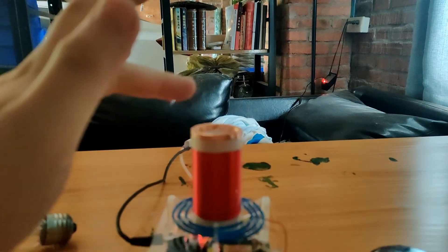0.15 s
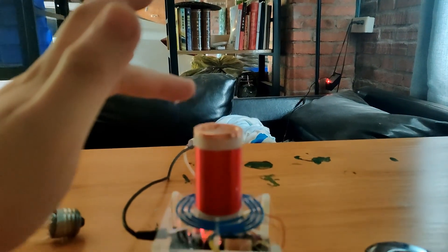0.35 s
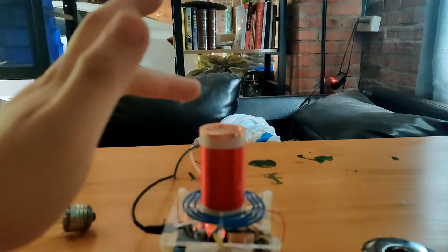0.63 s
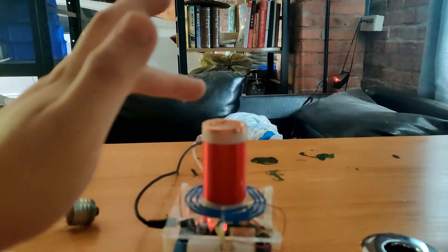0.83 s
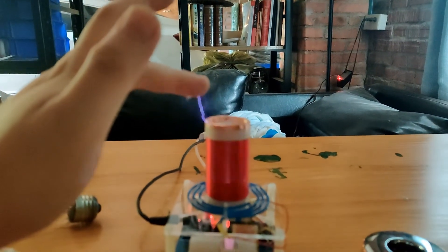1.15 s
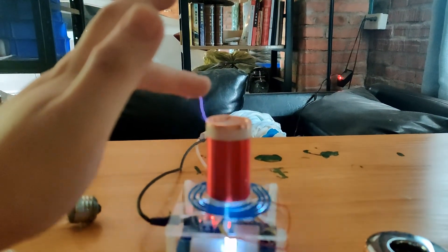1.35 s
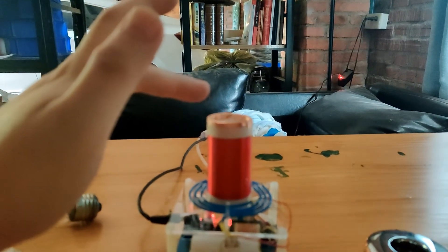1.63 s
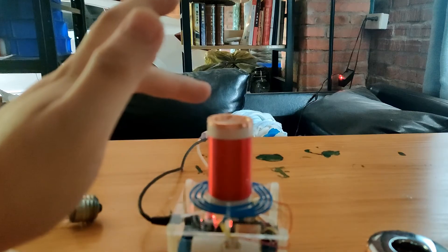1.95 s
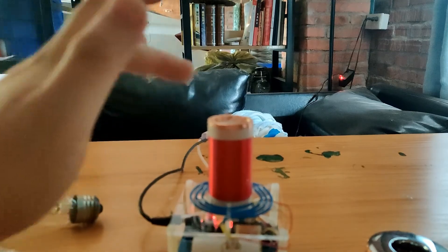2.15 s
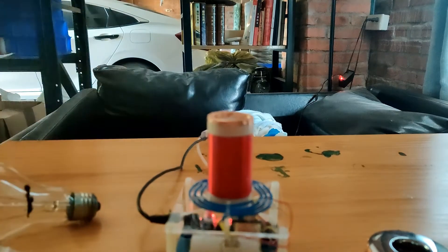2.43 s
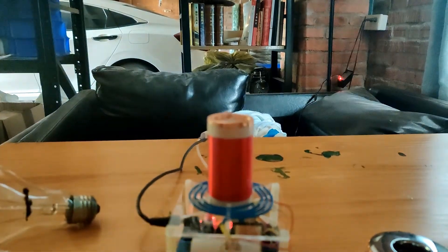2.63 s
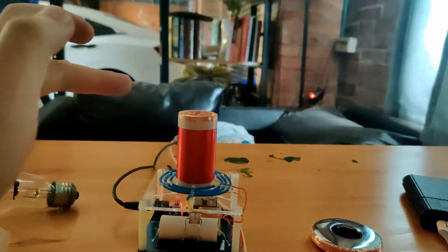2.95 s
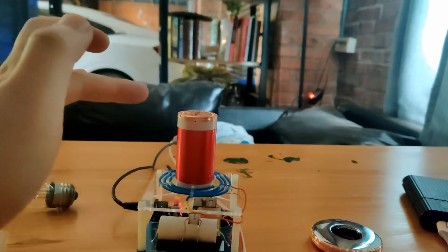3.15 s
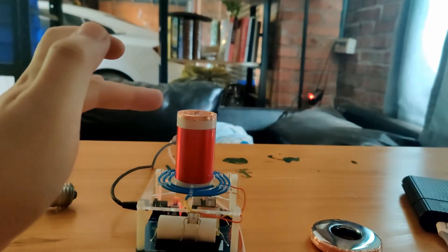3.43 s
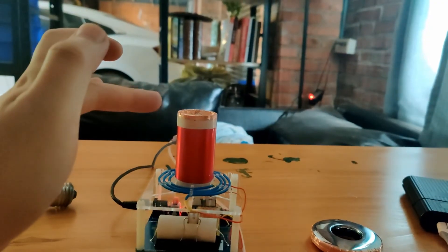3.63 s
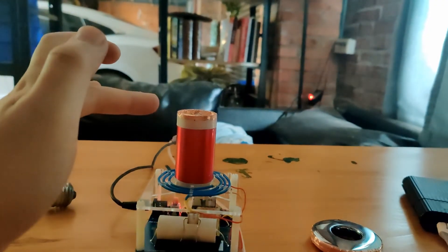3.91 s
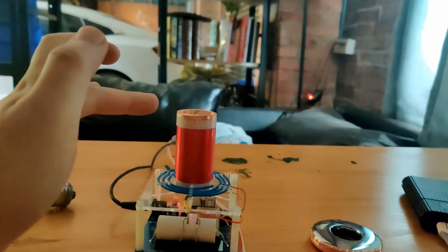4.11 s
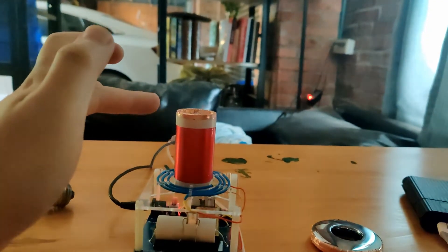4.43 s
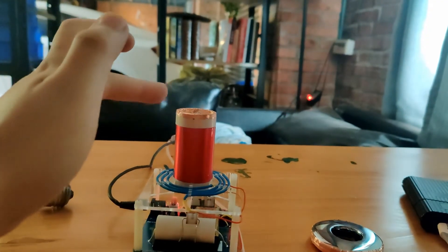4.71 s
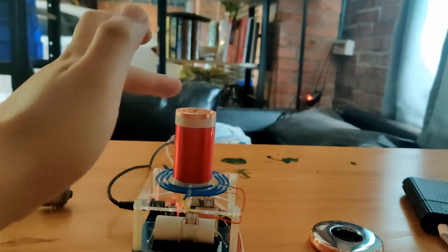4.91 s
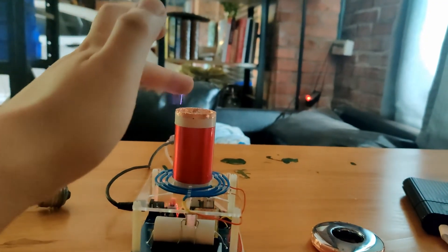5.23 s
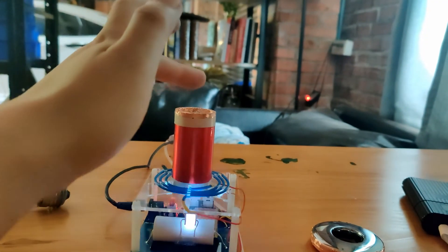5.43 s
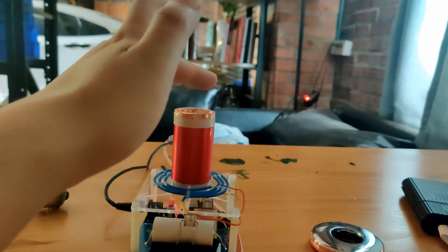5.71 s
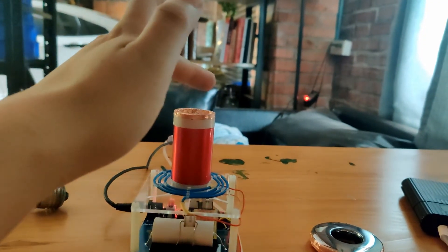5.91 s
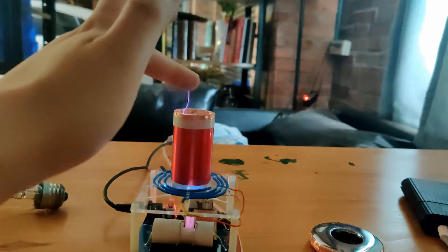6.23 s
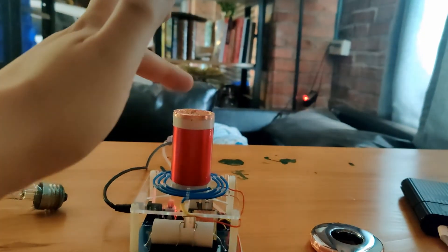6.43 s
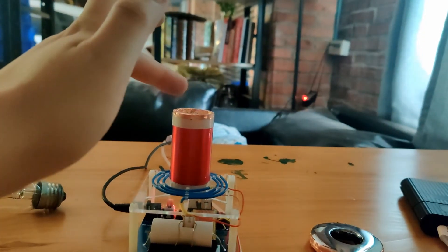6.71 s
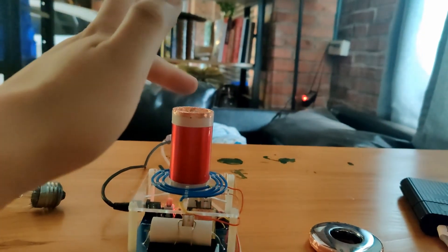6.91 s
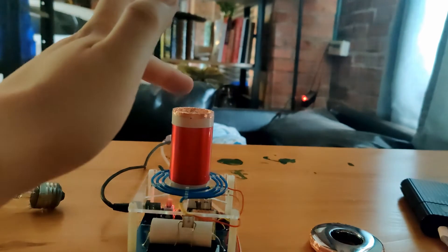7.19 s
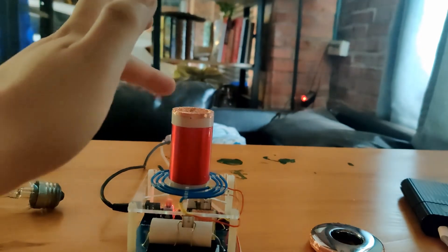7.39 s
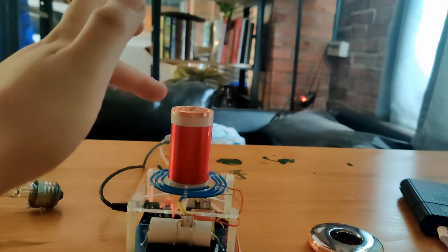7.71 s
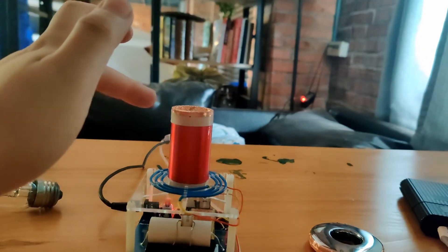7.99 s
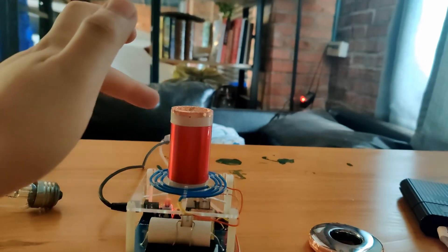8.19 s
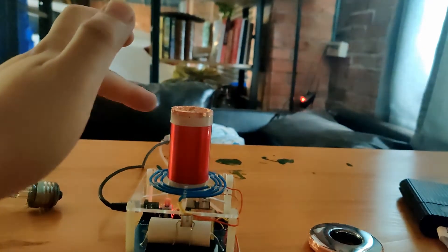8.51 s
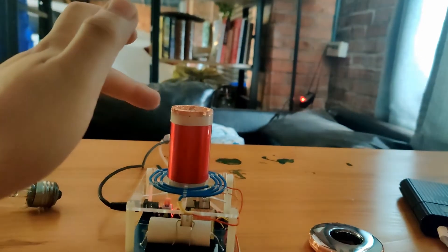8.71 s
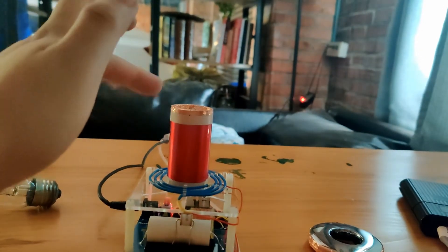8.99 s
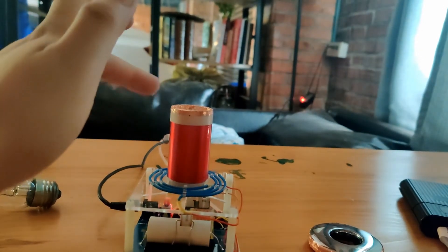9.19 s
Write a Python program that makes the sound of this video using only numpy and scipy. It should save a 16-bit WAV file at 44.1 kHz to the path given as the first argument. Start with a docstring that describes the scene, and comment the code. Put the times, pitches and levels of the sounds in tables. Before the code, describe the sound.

From 0 s a small spark coil on a table gives sharp electric cracks, nearly even, about ten a second, each a click of a few milliseconds with quick wall slaps and a short bright room tail. Between 0.35 and 0.85 s faint, hollow wooden knocks sound, mostly on the right. Cracks stay strong until 2.2 s, then become weaker and their tone changes. Around 2.73 to 2.86 s everything cuts out, then fades back in. Low rumble swells at about 3.1 s and continues underneath with faint hiss. From 3.7 s the tone changes again and cracks get fuller, loudest at roughly 5.4 to 6.6 s. After about 8.1 s they weaken sharply; the left side lurches with deep thumps and rough flutter, often nearly muted until 9.25 s, while small ticks persist on the right. Just before 9.3 s a strong crack returns.

```python
"""Sharp electric cracks come first, about ten a second, from a small spark-gap coil on a table in a brick room.
A phone with two microphones hears them; each crack is a burst of close arrivals, and walls and room answer in noise.
Wooden knocks ring as a few fading tones; rumble and hiss are filtered noise, and the crack colour changes twice.
The left input is pushed about by the coil's field and at last swings up to its rail; the sound drops out once."""
import sys
import numpy as np
from scipy import signal
from scipy.fft import rfft, irfft, next_fast_len
from scipy.io import wavfile
from scipy.ndimage import uniform_filter1d, map_coordinates

SR = 44100
rng = np.random.default_rng(int(sys.argv[2]) if len(sys.argv) > 2 else 0)


def unload_audio(sound):
    """Save the sound as a 16-bit wav file, at the path given as the first command line argument."""
    columns = np.transpose(np.atleast_2d(sound))
    # keep every value between -1 and 1, then stretch to whole-number steps
    steps = np.round(np.clip(columns, -1, 1) * 32767)
    wavfile.write(sys.argv[1], SR, steps.astype(np.int16))


N = 412335
TIME = np.arange(N) / SR  # s


def amp(db):
    """Turn dB into a plain gain."""
    return 10 ** (np.asarray(db) / 20)


def unit(x):
    """Bring each row to an average strength (rms) of 1."""
    return x / np.sqrt(np.mean(x ** 2, -1, keepdims=True) + 1e-20)


def curves(rows):
    """Join the points of each column after the time into a curve with one value per sample."""
    s, *columns = np.transpose(rows)
    return [np.interp(TIME, s, column) for column in columns]


def wobble(rate):
    """Draw a smooth random curve through `rate` random points a second."""
    points = rng.standard_normal(int(N * rate / SR) + 4)
    return map_coordinates(points, [TIME * rate])


def filtered(x, response):
    """Make each pitch in x louder or softer by a gain that depends on frequency."""
    length = next_fast_len(N + 8192)
    gain = response(np.fft.rfftfreq(length, 1 / SR))
    return irfft(rfft(x, length) * gain, length)[..., :N]


def colour(table, axis):
    """Turn one dB column into a gain over frequency, with mean power 1 from 2.5 to 16 kHz."""
    rows = np.array(table)

    def gain(hz):
        return amp(np.interp(np.log(hz + 1), np.log(rows[:, 0]), rows[:, axis]))

    treble = np.sqrt(np.mean(gain(np.linspace(2500, 16000, 99)) ** 2))
    return lambda hz: gain(hz) / treble


def causal(response):
    """Turn a gain curve into a short filter that answers as early as it can (minimum phase)."""
    cepstrum = irfft(np.log(response(np.fft.rfftfreq(512, 1 / SR))))
    cepstrum[1:256] *= 2
    cepstrum[257:] = 0
    return irfft(np.exp(rfft(cepstrum)))[:256]


def ramp(start, length):
    """Rise smoothly from 0 to 1 over `length` seconds."""
    return .5 - .5 * np.cos(np.pi * np.clip((TIME - start) / length, 0, 1))


# Background before its random swells: t/s, base rumble level/dB, base hiss level/dB
BACKGROUND = [(0, -59.5, -64), (.55, -52, -48), (1.1, -54, -59), (1.9, -59, -61), (2.35, -49.5, -56),
              (2.65, -52, -57), (2.95, -54.5, -56), (3.0, -45, -52), (3.15, -33, -51), (3.7, -38.5, -51),
              (3.85, -45, -52), (4.5, -41.5, -51), (5.3, -43.5, -51), (5.8, -43, -49), (6.8, -42, -49),
              (8.05, -45.5, -52), (8.25, -56, -70), (8.6, -63, -70), (9.15, -62, -64), (9.3, -37, -51)]


def rumble():
    """Lumpy noise, strongest at a few tens of Hz, mostly shared by both inputs and weaker on the left."""
    level_db, _ = curves(BACKGROUND)

    def low(hz):
        return (hz / 22) ** 2 / (1 + (hz / 22) ** 2) / (1 + (hz / 48) ** 3)

    shared, own = unit(filtered(rng.standard_normal((2, N)), low))
    return amp(level_db + 3.8 * wobble(7)) * np.array([0.34 * shared + 0.083 * own, shared])


# Colour of the hiss: f/Hz, relative level/dB
HISS_COLOUR = [(60, -11), (150, -1), (400, -5.5), (1000, -13.5), (2500, -17), (6000, -14.5), (16000, -48)]


def hiss():
    """The room's faint hiss is coloured noise; a band around 250 Hz hums in and out of it."""
    _, level_db = curves(BACKGROUND)
    shape = colour(HISS_COLOUR, axis=1)
    noise = unit(filtered(rng.standard_normal((2, N)), lambda hz: (hz > 60) * shape(hz)))
    hum = unit(filtered(rng.standard_normal(N), lambda hz: np.exp(-((hz - 250) / 60) ** 2)))
    noise = noise + amp(-16 + 3.8 * wobble(2.98)) * hum
    swell_db = 1.5 * wobble(5)
    return amp(level_db + swell_db) * noise * amp([[-6], [0]])  # left, right


# Blows on wood: t/s, relative level/dB, freedom to ring [0-1]
BLOWS = [(0.3627, -20, .08), (.409, -23, 0.9), (0.51, -22, 0.7), (0.617, -25, 0.3), (.627, -19, 0.9),
         (.64, -23.5, 0.4), (0.794, -26.5, 0.2), (.815, -19, 0.97)]
# Tones of the wood: f/Hz, usual relative level/dB, time to fall 60 dB when fully free/s
WOOD_TONES = [(180, -15, 0.19), (330, -5.5, 0.23), (406.4, -9.5, 0.31), (531, -2.5, 0.093),
              (747, -11, 0.094), (824, -21.5, 0.19), (978, -9.5, 0.054), (1176, -15, 0.1)]


def knocks():
    """A blow on wood sets fading tones ringing, with a soft puff of noise; it is louder on the right."""
    out, t = np.zeros(N + SR), np.arange(SR // 3) / SR
    for s, db, free in BLOWS:
        ring = np.zeros(len(t))
        for hz, level, t60 in WOOD_TONES:
            fade = amp(level + rng.normal(0, 1) - 60 * t / (t60 * free))
            waver = 0.61 * wobble(40)[:len(t)]  # radians; blurs the tone a little
            ring += fade * np.sin(2 * np.pi * hz * t + waver)
        soft = uniform_filter1d(uniform_filter1d(rng.standard_normal(len(t)), size=20), size=20)
        puff_fade = .25 * amp(-60 * t / (.09 * free + .01)) + .8 * amp(-60 * t / .025)
        push = 1 - np.exp(-t / 0.00041)  # the blow takes a moment to build up
        start = round(s * SR)
        out[start:start + len(t)] += amp(db - 3.0) * (ring + unit(soft) * puff_fade) * push
    return out[:N] * amp([[-12], [0]])  # left, right


# Slow shifts of the left bias: start t/s, end t/s, shift [parts of full scale], edge length/s
SHIFTS = [(-.05, .08, -.025, .007), (.08, .171, -.1, .007), (2.99, 3.02, -.025, .02), (3.02, 3.35, .05, .1),
          (7.99, 8.047, -.13, .022), (8.15, 9.4, -.2, .025)]


def drift():
    """The resting bias wanders, and charge put on the input leaks away slowly."""
    leak_s = 1.6
    out = -.005 + 0.0039 * wobble(4.6)
    for start, end, depth, edge in SHIFTS:
        held = ramp(start, edge) * (1 - ramp(end, edge))
        out += depth * held * np.exp(-np.abs(TIME - start) / leak_s)
    return out


# Spark-driven jumps: t/s, creep before and jump after [parts of full scale], recovery time/s
BIAS_JUMPS = [(.1725, -.07, -.02, .3), (4.378, 0, .07, .04), (4.487, -.1, 0, .01), (4.595, -.05, 0, .01),
              (4.916, 0, .11, .03), (5.008, -.05, 0, .01), (6.716, .07, -.04, .02), (6.913, -.04, 0, .01),
              (7.9045, 0, .14, .05), (8.0006, .07, -.12, .003), (8.0935, .1, 0, .002),
              (8.0988, -.04, .52, .07), (8.1995, -.28, .15, .02), (8.2047, .12, -.35, .004),
              (8.325, -.28, -.28, .007), (8.8815, 0, -.2, .002), (8.886, -.45, 0, .02),
              (9.2775, -.38, .09, .02)]


def jumps():
    """A spark throws the charge on the left input off; it creeps beforehand and recovers afterwards."""
    creep_s = .004
    out = np.zeros(N)
    for s, creep, jump, recovery in BIAS_JUMPS:
        before = TIME < s
        out += np.where(before, creep, jump) * np.exp(-np.abs(TIME - s) / np.where(before, creep_s, recovery))
    return out


def sputter():
    """A short burst of dull noise sputters around the double jump at about 8.2 s."""
    noise = unit(filtered(rng.standard_normal(N), lambda hz: (hz < 3300) / (1 + hz / 500)))
    return .022 * noise * np.exp(-((TIME - 8.203) / .019) ** 4)


# Swings to the upper rail: start t/s, fall start t/s,
# height there and dip at the start [parts of full scale, before waver and flattening]
RAIL_SWINGS = [(8.261, 8.358, 1.05, .11), (8.491, 8.546, 1.05, .42), (8.662, 8.73, 1.1, .3),
               (8.862, 8.935, .7, .04), (9.051, 9.178, .48, .18)]


def swings():
    """The charge lifts the left input to its rail and lets it fall, with a rough tremor and late ripples."""
    rise_s, fall_s, top = .023, .039, 1.06

    def rough(hz):
        return (hz > 60) / (1 + (hz / 160) ** 2) / (1 + (hz / 800) ** 4)

    tremor = .011 * unit(filtered(rng.standard_normal(N), rough))  # the charge never moves smoothly
    out = np.zeros(N)
    for start, end, last, dip in RAIL_SWINGS:
        held = ramp(start, rise_s) * (1 - ramp(end, fall_s))
        landed = TIME - end - fall_s
        height = np.interp(TIME, [start + rise_s, end], [top, last]) * (1 + .05 * wobble(55))
        out += height * held - dip * np.exp(-((TIME - start) / 0.0047) ** 2)
        edges = np.exp(-((TIME - start) / 0.023) ** 2) + np.exp(-(landed / 0.022) ** 2)
        out += tremor * (edges + 0.29 * held)
        out += .045 * wobble(110) * np.exp(-(landed / .014) ** 2)  # settling ripples
    return out


def bias():
    """The coil's field charges the left input: the pushes add up and flatten softly near the rail."""
    out = drift() + jumps()
    out = uniform_filter1d(uniform_filter1d(out, size=9), size=9)  # the input cannot jump at once
    out += sputter() + swings()
    return out / (1 + np.abs(out / 1.3) ** 12) ** (1 / 12)


# The sparks: t/s, right crack energy level/dB, fatness of the arc = left low-pop energy level/dB
SPARK_LIST = [(.0049, -3.5, -32), (0.0822, -3, -23), (.18, 3, -6), (.287, 3, -4), (0.3942, 5, -7),
              (0.4918, -0.5, -31), (.599, 2, -34), (0.7068, 4, -28), (0.8161, 4, -14), (0.9134, 4.5, -17),
              (1.0104, 4, -7), (1.1183, 4, -12.5), (1.225, 3.5, -20), (1.3229, 4, -10), (1.4298, 1.5, -21),
              (1.5381, 8, -21), (1.6457, 6.5, -5), (1.7428, 6, -21), (1.8412, 2, -7), (1.9376, 4, -6),
              (2.0459, 1.5, -11), (2.154, 4.5, -7), (2.2624, -5.5, -20), (2.3697, -6.5, -24),
              (2.4779, -4.5, -18.5), (2.5952, -3, -18.5), (2.7043, -6.5, -21), (2.9086, -11, -27),
              (3.0157, -5, -18), (3.1244, -3.5, -16.5), (3.221, -3, -17), (3.3184, .5, -17),
              (3.426, 1.5, -18), (3.5335, 1.5, -22), (3.6326, 0.5, -22), (3.7394, 4, -2.5), (3.8471, 5, -6),
              (3.9436, 0, -23), (4.052, 4.5, -4.5), (4.1596, 4, -4.5), (4.2664, 1.5, -28),
              (4.3766, 3.5, -6), (4.4942, 3.5, -6), (4.6019, 4, -12), (4.6994, 5, -11.5), (4.8073, 5, -9),
              (4.9147, 6, -8.5), (5.012, 6.5, -11), (5.1194, 7, -12), (5.2168, 7, -12.5), (5.314, 6, -9.5),
              (5.4112, 8.5, -14), (5.5085, 8.5, -20), (5.605, 8.5, -15.5), (5.713, 9, -11),
              (5.8105, 6, -11.5), (5.9073, 6, -10.5), (6.0139, 5, -18), (6.1123, 8, -9.5),
              (6.2209, 10, -15.5), (6.317, 7, -5.5), (6.4145, 6.5, -8), (6.5116, 6, -6.5),
              (6.6086, 7.5, -14.5), (6.7161, 4.5, -9), (6.8132, 5, -11), (6.9109, 6, -8), (7.0185, 6, -24),
              (7.1263, 6, -19), (7.2239, 7.5, -19), (7.3204, 4.5, -10), (7.4179, 3.5, -4.5),
              (7.515, 3.5, -9), (7.612, 4.5, -3), (7.7096, 4, -5), (7.8068, 3, -3.5), (7.903, 4, -5.5),
              (8.0008, 1, -10), (8.0975, -12, -4), (8.2046, -6.5, -17), (8.3127, -9.5, -12),
              (8.4206, -8, -4), (8.5192, -12, -8), (8.5952, -7.5, -1), (8.6911, -9.5, -10),
              (8.7885, -8, -24), (8.886, -9, -19), (8.983, -9, -20), (9.0792, -14, -19), (9.177, -9, -36),
              (9.2855, 4, -11)]
# A usual spark at the left microphone: t/s, level/dB
LEFT_LEVEL = [(0, -15), (.1, -0.5), (2.2, 1), (2.7, 0.5), (2.9, -5.5), (3.6, -5), (4.5, 0), (5.5, 0),
              (6.3, 1), (7.1, 0), (8.1, 2), (8.2, -13), (8.31, -7.5), (9.2, -7), (9.3, -0.5)]
# When the phone changes place: t/s
MOVE_TIMES = [2.2, 3.7]
# Extra left crack for a fatter arc, one value per place [dB per dB of fatness]
FATNESS_LIFT = [0.067, 0.24, 0.31]


def spark_levels():
    """A fatter arc lifts the left crack and the pop; the pop is faint and fickle on the right."""
    s, right, fat = np.transpose(SPARK_LIST)
    extra = fat - -11  # dB above the usual fatness
    lift = np.array(FATNESS_LIFT)[np.searchsorted(MOVE_TIMES, s)]
    left = np.interp(s, *np.transpose(LEFT_LEVEL)) + lift * extra
    pop_right = -18.5 + 0.27 * extra + 5.5 * rng.standard_normal(len(s))
    return np.transpose([s, left, right, fat, pop_right])


# Echoes from the walls: delay t/ms, spread/ms, left level/dB, right level/dB
WALL_ECHOES = [(10.86, 0.38, -4, 9), (19.9, 3.3, 0, 0.5), (33, 2.3, -26, -13)]


def wall_echoes(ms):
    """Sound back from a wall is smeared: its power rises fast and dies over its spread, left and right."""
    power = np.zeros((2, len(ms)))
    for delay, spread, *db in WALL_ECHOES:
        u = (ms - delay) / spread
        shape = np.exp(-np.abs(u) * np.where(u < 0, 2.5, 1))
        power += amp(db)[:, None] ** 2 * shape
    return power


# Spark colour in each of three places: f/Hz,
# then relative level/dB for crack left, crack right, room left, room right
NEAR_COLOUR = [(1510, -12.5, -19.5, -8, -7.5), (2200, -20.5, -33, -11.5, -14), (3010, 4, -22, -12, -7),
               (4000, -4, -8.5, -10.5, -13), (4900, 7.5, -7.5, -8, -8.5), (5580, -24, -3.5, -10.5, -11.5),
               (6140, -1, -16, -21.5, -10), (7340, -13, 0.5, -12, -1.5), (7940, -5.5, -14.5, -8, -11),
               (9900, -5.5, -19, -19, -11), (11300, -3.5, -11.5, -3.5, -9), (12900, -3.5, -11, -16.5, -7.5),
               (13700, 2.5, -11.5, -10, -6.5), (15000, -1, -9.5, -2.5, -15)]
AWAY_COLOUR = [(1550, -55, -13.5, -12, -6), (2310, -14, -10, -14.5, -7.5), (2920, -27, -5.5, -14, -2),
               (3770, 6, -4.5, -17, -6.5), (4740, 22, 0, -15, -3.5), (5830, 1, -3, -21, -3.5),
               (6750, -38, 8, -24, -1), (7330, 0, 2, -20, -6), (7900, 6.5, -17, -17, -8),
               (9600, 8, -10, -11.5, -16), (11700, 12, -12, -19, -5.5), (12450, 8, -9, -12, -9),
               (13900, 14, -11, -10, -2.5), (15700, 9, 2, -6, -3)]
ABOVE_COLOUR = [(1560, -4.5, -16.5, -2, -2), (2260, 3.5, -52, -5, -9), (2740, 0.5, -12, -6, -2),
                (4200, -5, -3.5, -8, -5), (4520, -6.5, -0.5, -1, -4.5), (5400, -2.5, 6, -8, 1.5),
                (6080, -12, -7, -19, -1), (6515, 1.5, 13, -17, 3), (7550, -8.5, -2, -1, 1),
                (8340, 4.5, -16.5, -4.5, -9.5), (9960, -1.5, -6.5, -2, -5), (11440, 7, 3.5, -0.5, -3),
                (14100, -5.5, 1.5, 1, 2), (15300, 6.5, 1.5, 3, 0.5)]
PLACES = (NEAR_COLOUR, AWAY_COLOUR, ABOVE_COLOUR)


def room():
    """Every spark starts wall echoes and a decay, played as coloured noise; the treble dies first."""
    ms = np.arange(SR // 3) * 1000 / SR
    s, right, _ = np.transpose(SPARK_LIST)
    # the room follows the crack level, but no lower than -13 dB on the right
    heard = [np.interp(s, *np.transpose(LEFT_LEVEL)), np.maximum(right, -13)]
    feed_db = [-41, -37] + np.transpose(heard) * [1.0, 1.05]
    feed = amp(np.transpose(feed_db)) ** 2
    linger = np.array([np.interp(TIME, s, row) for row in feed])  # steady sound between sparks
    train = np.zeros((2, N))
    train[:, np.round(s * SR).astype(int)] = feed * amp(rng.normal(0, 1.2, len(s))) ** 2
    place = np.searchsorted(MOVE_TIMES, TIME)

    def lower(hz):
        return (hz < 8000) / (1 + (1700 / (hz + 1)) ** 4)

    def treble(hz):
        return hz >= 8000

    out = np.zeros((2, N))
    for t60, band in ((0.31, lower), (0.22, treble)):  # t60: seconds to fall 60 dB
        slow = amp(-60 * ms / 1000 / t60) ** 2
        quick = amp(7.5 - 60 * ms / 25) ** 2
        decay = (ms > 1.8) * (slow + quick) + wall_echoes(ms)
        power = np.abs(signal.fftconvolve(train, decay, axes=1)[:, :N]) + amp(-14) ** 2 * linger
        for k, table in enumerate(PLACES):
            noise = [filtered(rng.standard_normal(N), lambda hz: band(hz) * colour(table, axis=c)(hz))
                     for c in (3, 4)]
            out += (place == k) * np.sqrt(power) * noise
    return out


# Paths of one crack, direct first, then base plate, table top and hand:
# delay t/ms, relative left strength, relative right strength
CRACK_PATHS = [(0, -1, 0), (.27, 0, .5), (.42, .3, -.15), (.75, -.08, .15), (1.0, .1, -.25),
               (1.36, -.2, -1), (1.55, .08, .35), (1.95, .06, .2)]


def cracks():
    """A spark's snap arrives by several short paths with a little scatter; a fat arc adds a low pop."""
    out, ms = np.zeros((2, N + SR)), np.arange(160) * 1000 / SR
    delay, *strength = np.transpose(CRACK_PATHS)
    arrivals = np.round(delay * SR / 1000).astype(int)
    # in each pair below: left, right
    begun = ms > np.array([[.05], [.27]])
    scatter = np.array([[.04], [.07]]) * begun * np.exp(-(ms / np.array([[1.6], [2.6]])) ** 2)
    filters = [[causal(colour(place, axis=c)) for c in (1, 2)] for place in PLACES]
    late = np.clip(ms - np.array([[0], [.3]]), 0, None)
    pop = -late * np.exp(-late / np.array([[.05], [.09]])) * (1 - late / np.array([[.5], [.4]]))
    pop /= np.linalg.norm(pop, axis=1, keepdims=True)
    for s, *db in spark_levels():
        burst = scatter * rng.standard_normal(scatter.shape)
        burst[:, arrivals] += strength * amp(rng.normal(0, 1.5, len(CRACK_PATHS)))
        burst /= np.linalg.norm(burst, axis=1, keepdims=True)
        i = round(s * SR)
        for c, h in enumerate(filters[np.searchsorted(MOVE_TIMES, s)]):
            crack = amp(db[c]) * np.convolve(burst[c], h)
            out[c, i:i + len(crack)] += crack
            out[c, i:i + len(ms)] += amp(db[c + 2]) * pop[c]
    return out[:, :N]


# When the left input passes almost no sound: start t/s, end t/s
PINNED_SPANS = [(8.235, 8.256), (8.38, 8.86), (8.937, 9.045), (9.217, 9.257)]


def scene():
    """Add all sources; a pinned left input passes its sound 38 dB weaker, and its bias comes on top."""
    sound = rumble() + hiss() + knocks() + room() + cracks()
    pinned = sum((TIME > start) & (TIME < end) for start, end in PINNED_SPANS)
    sound[0] *= amp(-38 * uniform_filter1d(1.0 * pinned, size=200))
    sound[0] += bias()
    return sound


# The dropout: start t/s, end t/s, fade-in length/s
DROPOUT = (2.729, 2.862, 0.025)


def record(dry):
    """Cut the sound out once and fade it back in, then remove what lies above about 16 kHz."""
    start, end, fade = DROPOUT
    fade_out = np.clip((start - TIME) / 0.0024, 0, 1)
    fade_in = np.clip((TIME - end) / fade, 0, 1)
    gate = np.where(TIME < end, fade_out, fade_in)
    return filtered(dry * gate, lambda hz: 1 / (1 + (hz / 16000) ** 200))


dry = scene()
out = record(dry)
unload_audio(out)
```